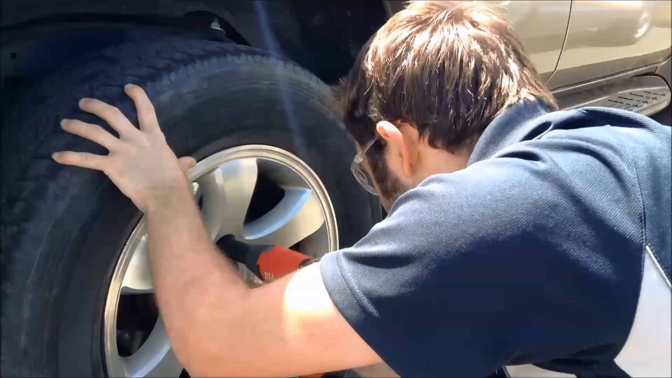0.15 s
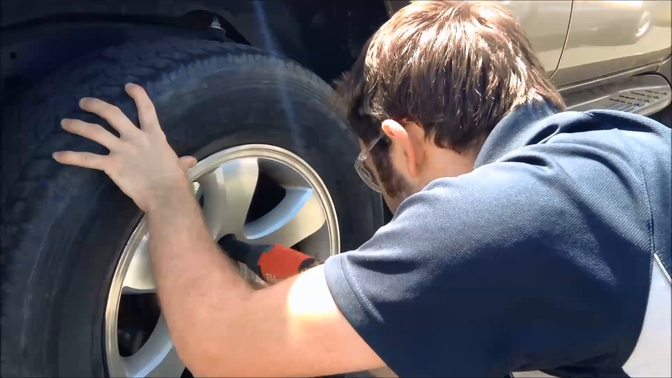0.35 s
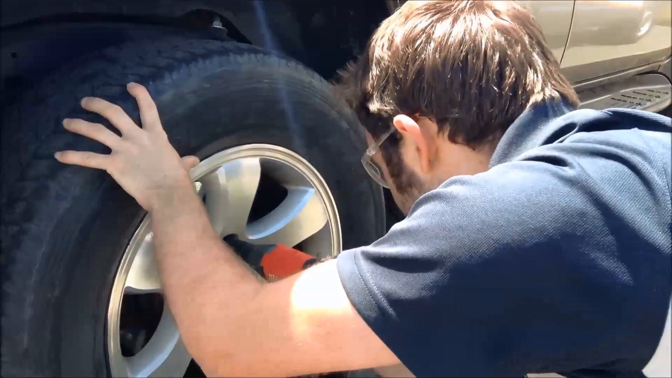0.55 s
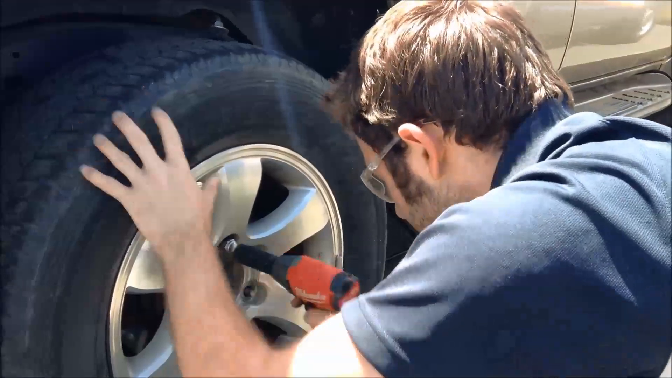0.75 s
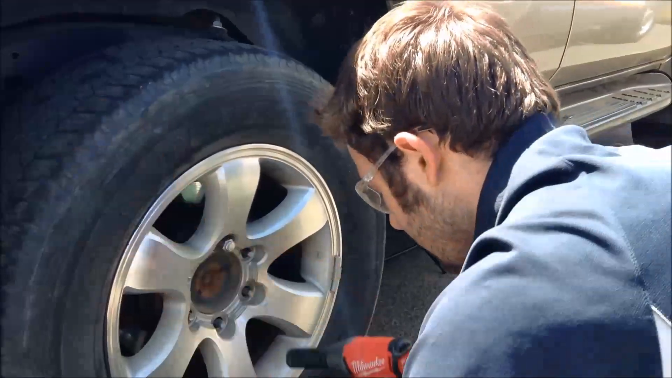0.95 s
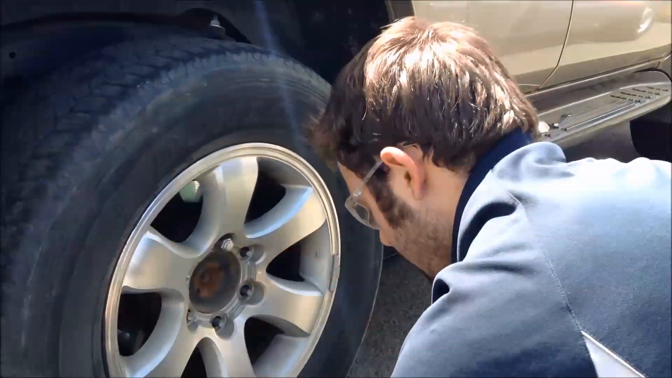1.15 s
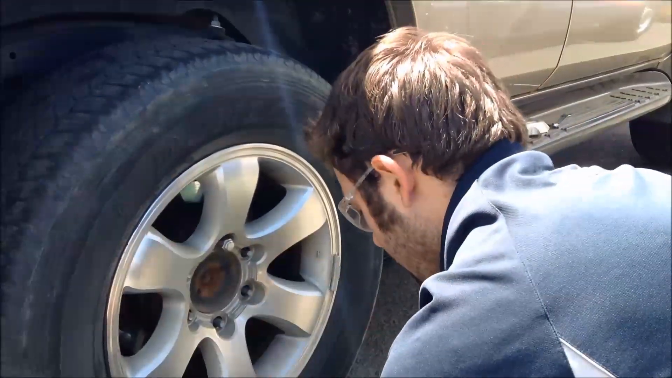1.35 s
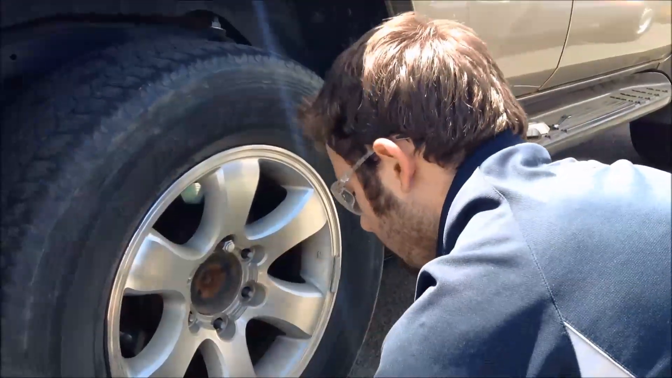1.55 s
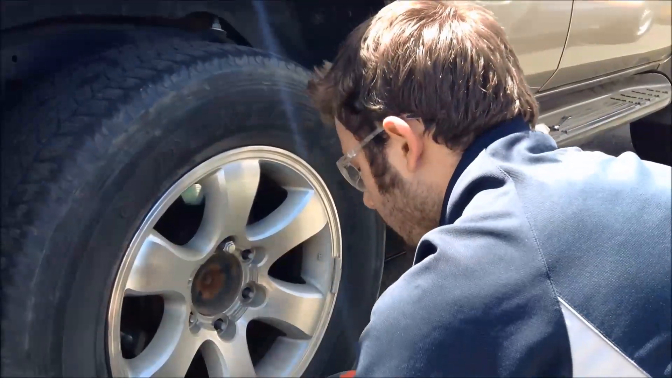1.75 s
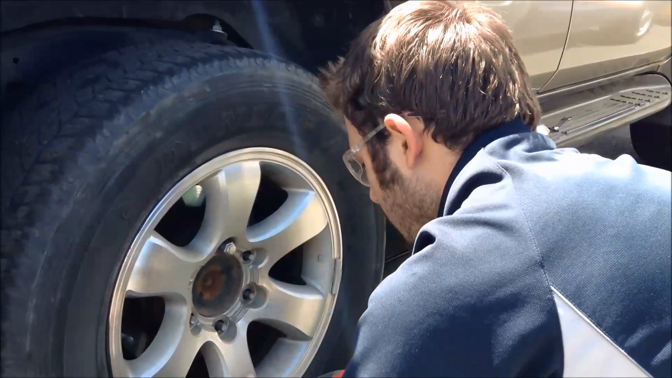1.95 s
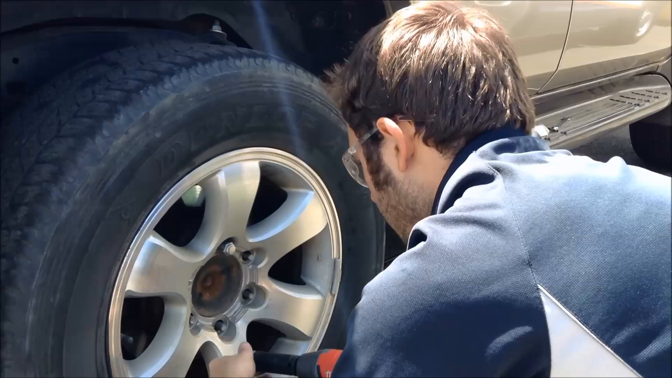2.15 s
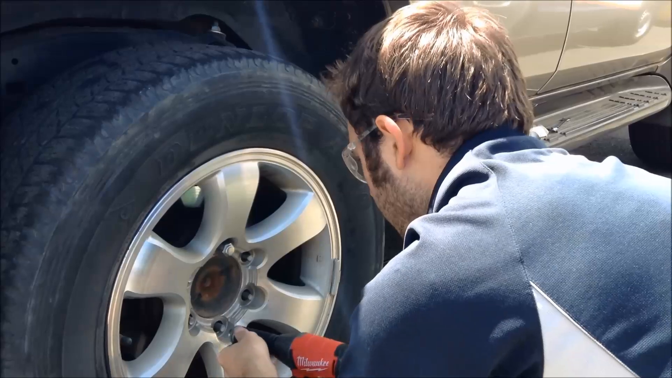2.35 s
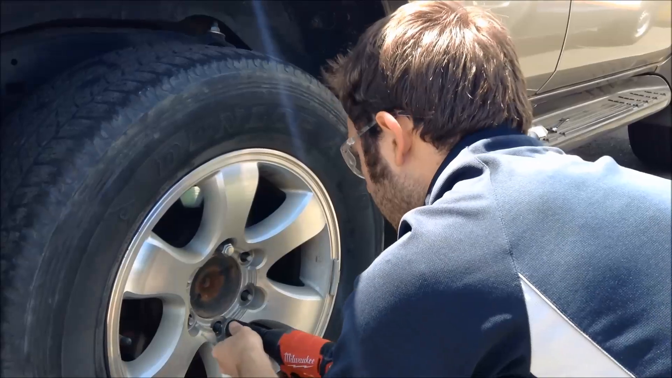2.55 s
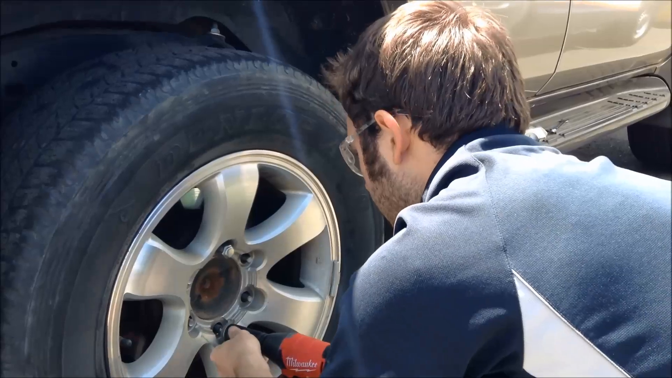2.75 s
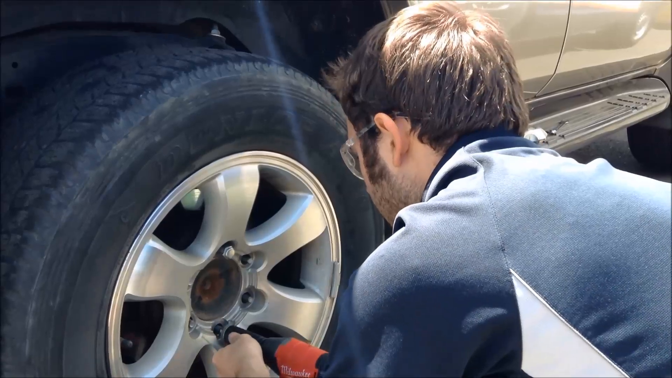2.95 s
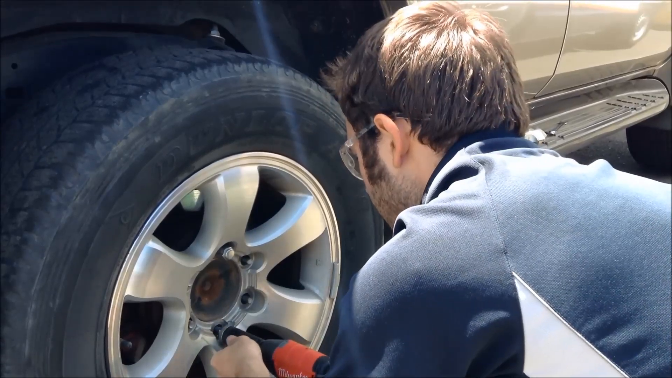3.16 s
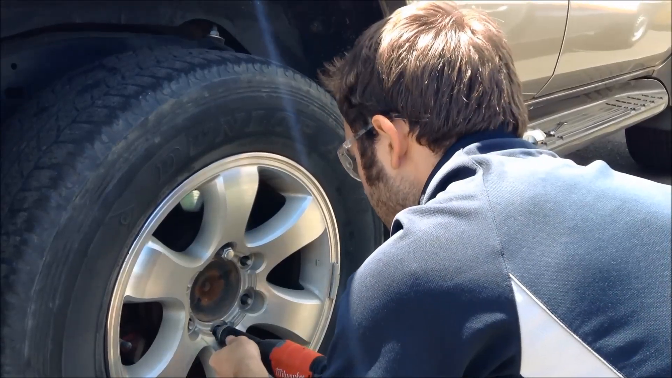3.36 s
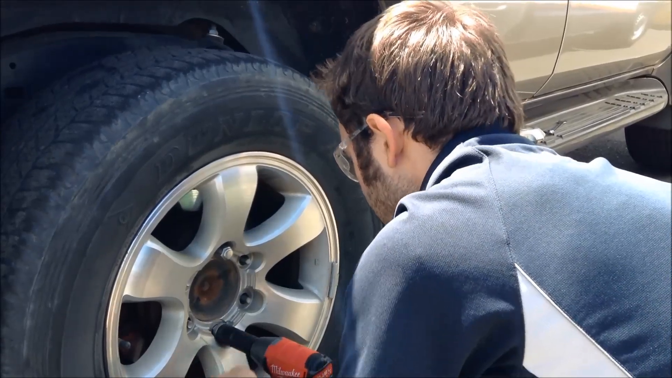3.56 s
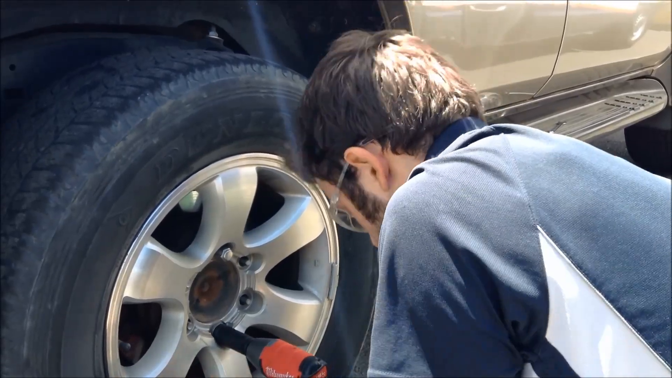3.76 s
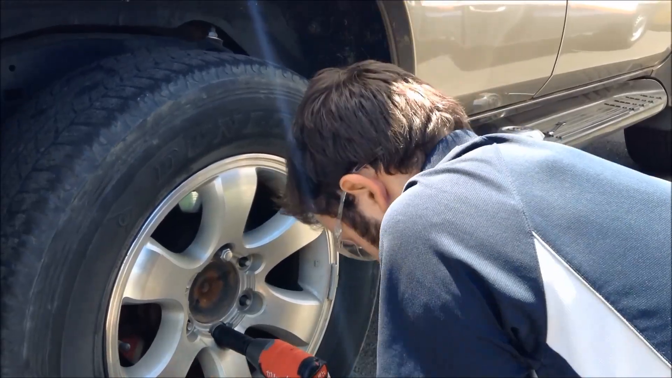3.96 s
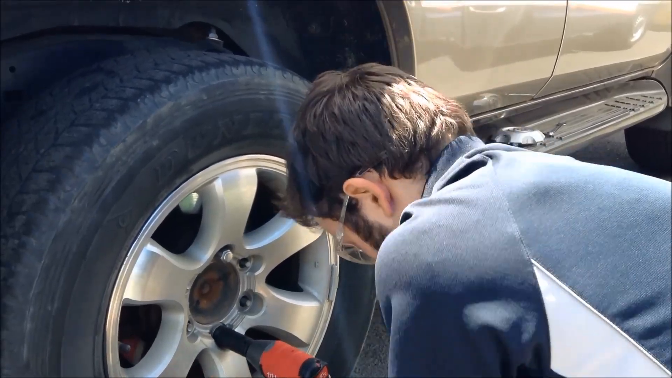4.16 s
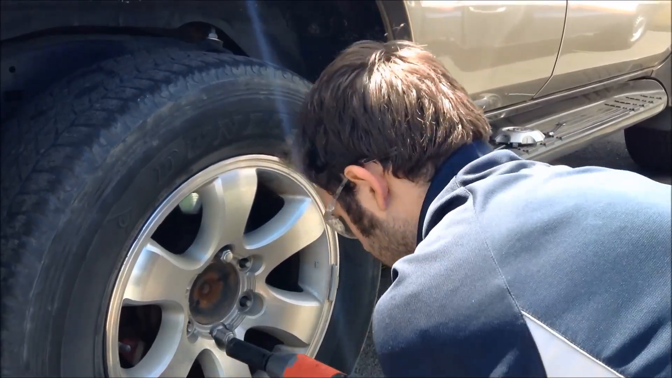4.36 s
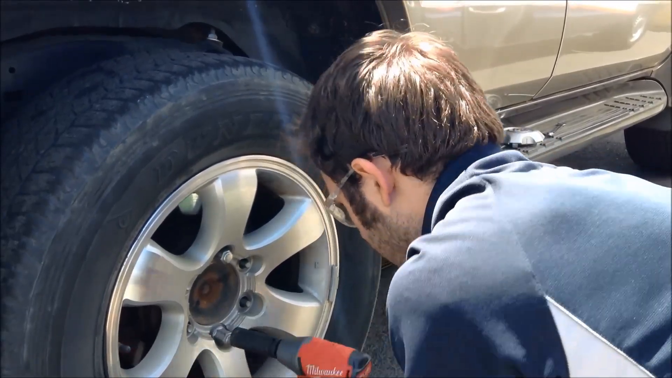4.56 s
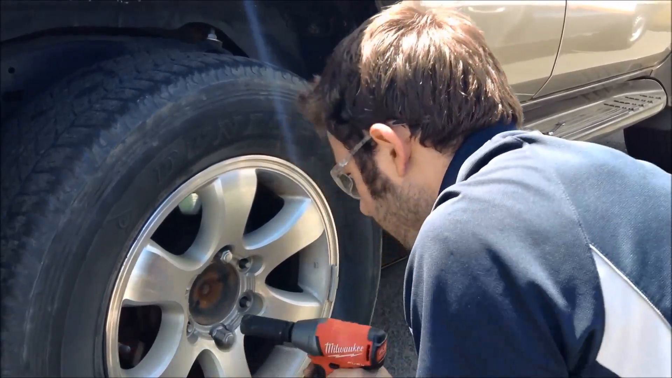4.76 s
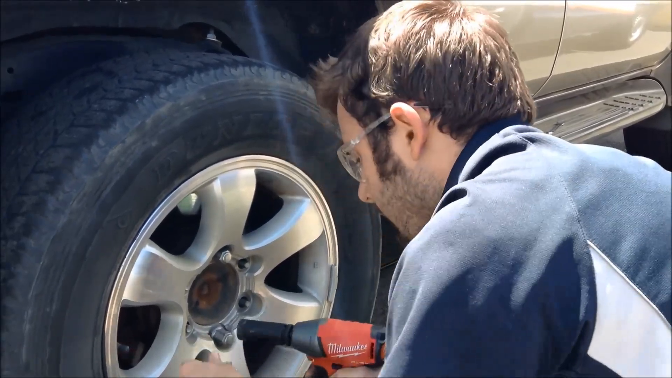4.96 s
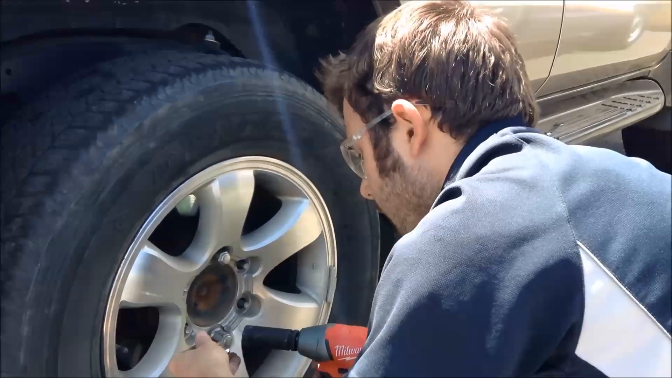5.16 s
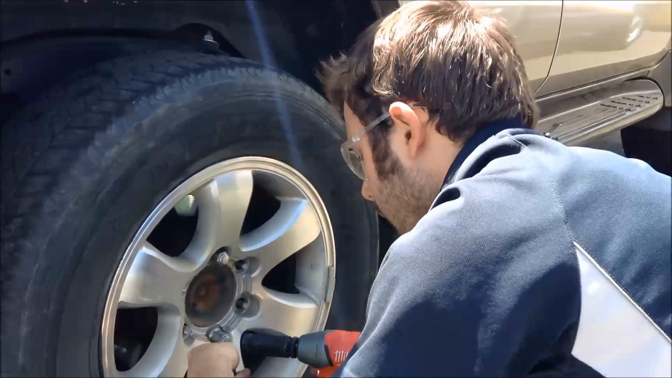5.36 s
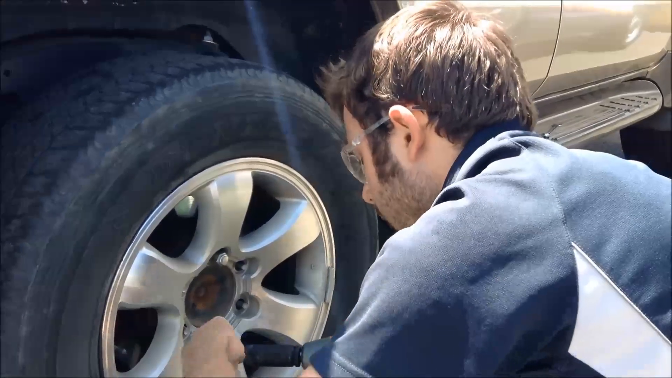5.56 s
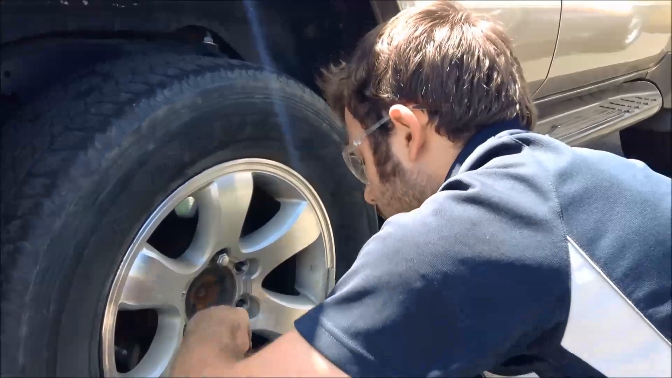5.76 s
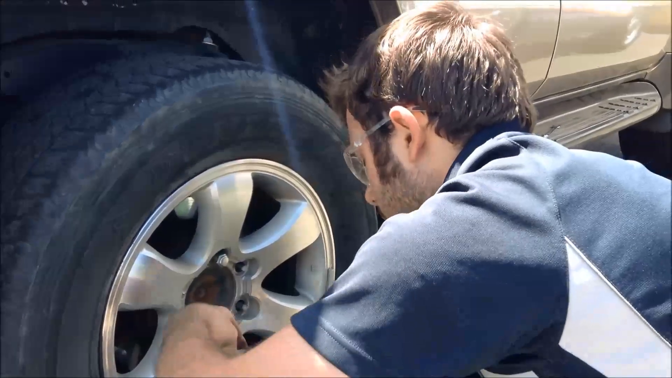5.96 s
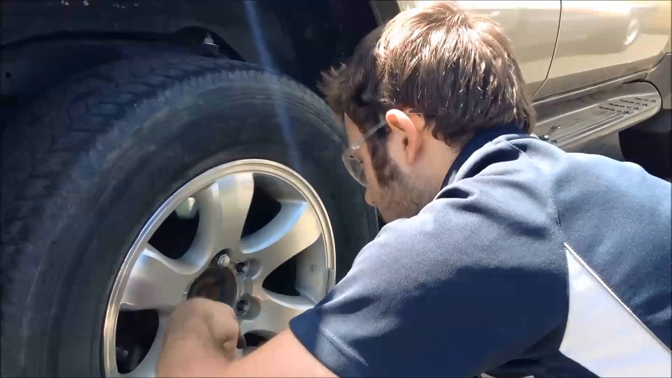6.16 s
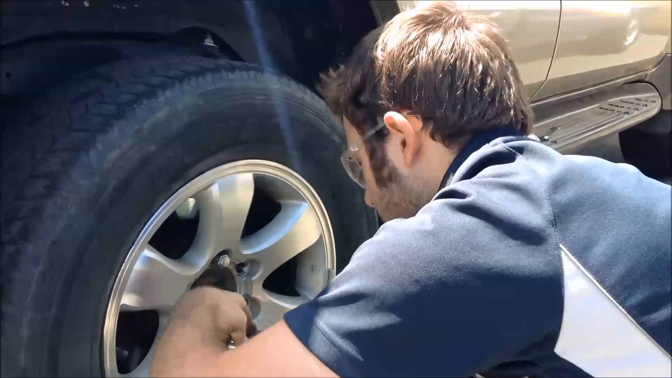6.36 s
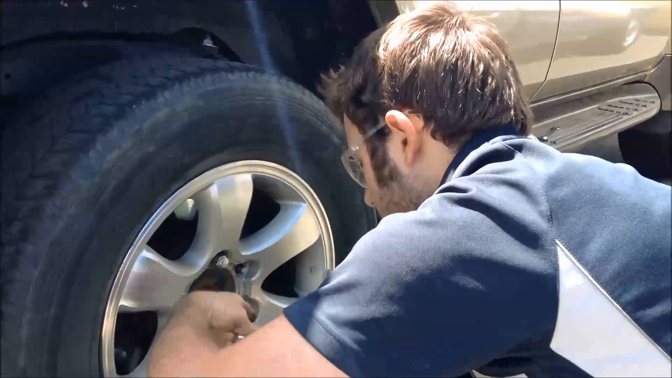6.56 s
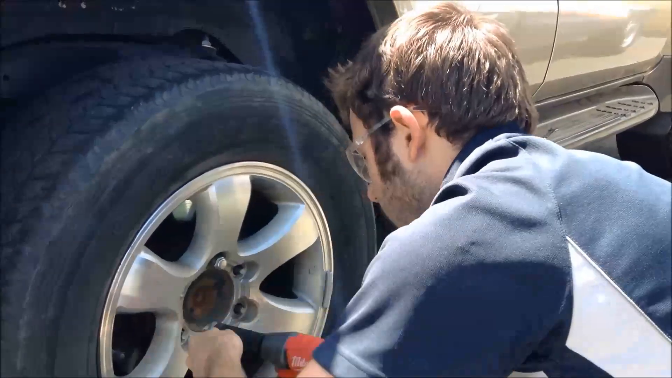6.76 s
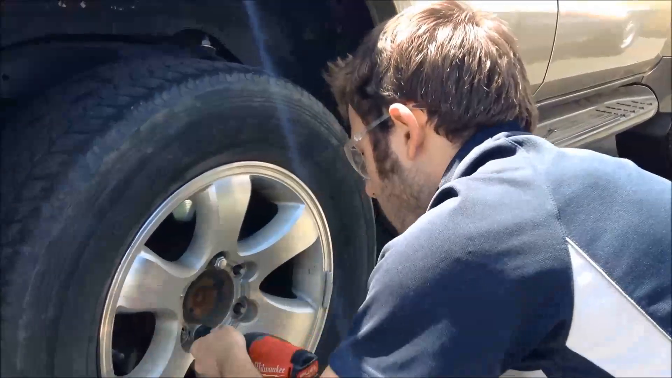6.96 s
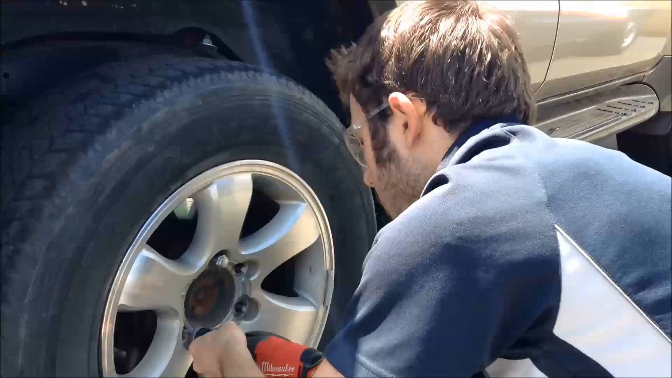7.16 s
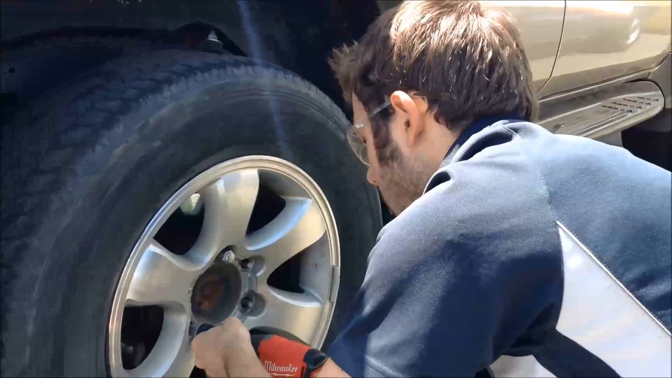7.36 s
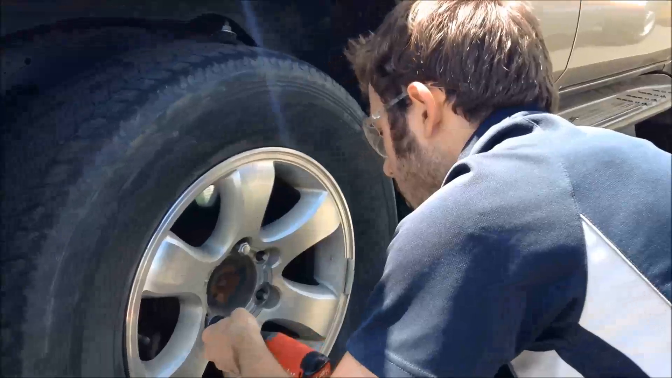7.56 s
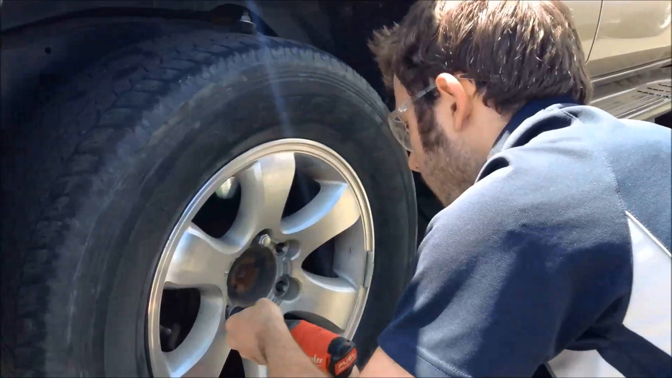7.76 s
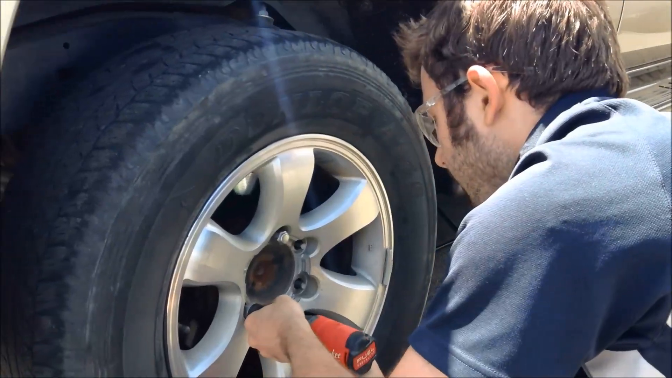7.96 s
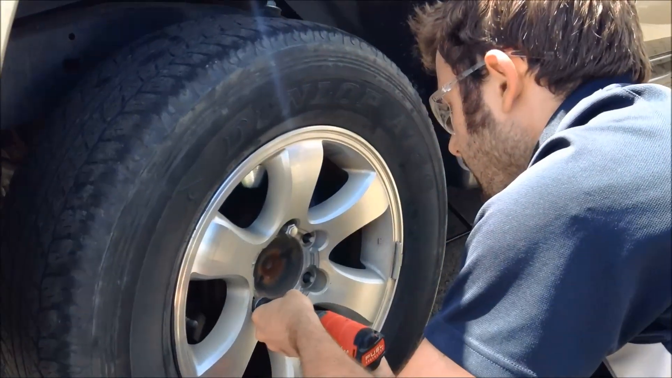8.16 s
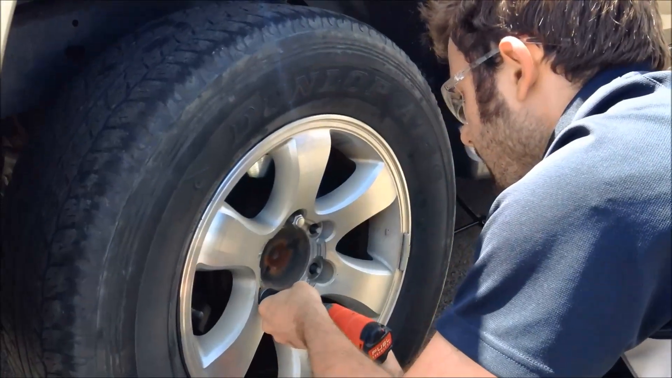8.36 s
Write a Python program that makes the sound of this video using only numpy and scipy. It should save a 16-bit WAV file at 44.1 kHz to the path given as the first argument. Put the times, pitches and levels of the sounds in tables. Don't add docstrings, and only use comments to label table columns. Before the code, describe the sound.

The sound opens with a cordless impact wrench already whirring close by; its loose socket clatters from 0.1 s, then harsh hammering, about fifty blows a second, runs from 0.3 to 0.67 s. The wheel rings briefly and the yard answers. Until 3 s there is distant traffic, soft wind and sparse metal clicks, sharper at 1.8-1.9, 2.25 and 2.7 s. At 3.1 s the socket rattles, the motor whines and whirrs with rising gear notes, and a second heavy burst with low thuds hammers from 3.87 to 4.25 s, stumbling to a stop. A faint cloth brush passes at 4.7 s. A nut rings high and is damped at 5.3 s; light clinks follow at 5.6-5.8, 6.5 and 7.1-7.5 s. Wind rumbles more near 7.9 s. At 8.2 s the socket clatters and the motor whines up again, still running at the end.

```python
import sys
import numpy as np
from scipy import signal
from scipy.fft import rfft, irfft, next_fast_len
from scipy.io import wavfile

SR = 44100
rng = np.random.default_rng(int(sys.argv[2]) if len(sys.argv) > 2 else 0)


def store_pcm(level_fs):
    pcm = np.round(np.clip(level_fs, -1, 1) * 32767).astype(np.int16)
    wavfile.write(sys.argv[1], SR, np.atleast_2d(pcm).T)


def gain_from_db(level_db):
    decades = np.asarray(level_db, float) / 20
    return 10 ** decades


N = 374850

# (time [s], peak level [dB])
BLOW_TIMES = [
    [(0.3092, 0), (0.3311, -1), (0.3511, 1), (0.3716, 0), (0.3925, 1), (0.413, 0), (0.4334, 2), (0.4534, 0),
     (0.4738, 1), (0.4943, 1), (0.5142, 0), (0.5342, 0), (0.5536, 2), (0.5741, 0), (0.594, 2), (0.6134, 0),
     (0.6345, 0)],
    [(3.8733, 0), (3.8943, 3), (3.9152, 0), (3.9362, 1), (3.9571, 1), (3.9781, 1), (3.9985, 1), (4.0185, 1),
     (4.0389, 0), (4.0594, 2), (4.0793, 2), (4.0998, 1), (4.1193, 1), (4.1397, 0), (4.1602, 2), (4.1796, 2),
     (4.2001, 1)],
]
SOCKET_HZ = 12900


def rms_one(x):
    return x / np.sqrt(np.mean(x ** 2) + 1e-20)


def in_time(rows, fade=0.0028):
    s, *columns = np.transpose(rows)
    t = np.arange(N) / SR
    opening = np.clip((t - s[0]) / fade + (s[0] == 0), 0, 1)
    closing = np.clip((s[-1] - t) / fade + 1, 0, 1)
    return [np.interp(t, s, c) for c in columns] + [opening * closing]


def at_hz(points, hz):
    points = np.array(points)
    return np.interp(np.log(hz + 1), np.log(points[:, 0]), points[:, 1])


def colour(x, spectrum):
    size = next_fast_len(N)
    gain = gain_from_db(at_hz(spectrum, np.arange(size // 2 + 1) * SR / size))
    return irfft(rfft(x, size) * rms_one(gain), size)[:N]


def band(x, low_hz, high_hz):
    return signal.sosfilt(signal.butter(2, [low_hz, high_hz], "band", fs=SR, output="sos"), x)


def drift(rate_hz):
    r = np.exp(-2 * np.pi * rate_hz / SR)
    wander = signal.lfilter([1], [1, -2 * r, r * r], rng.standard_normal(N + SR))
    return rms_one(wander[SR:])


def ring(force, hz, t60):
    r, w = gain_from_db(-60 / (t60 * SR)), 2 * np.pi * hz / SR
    return signal.lfilter([0, np.sin(w)], [1, -2 * r * np.cos(w), r * r], force + 1e-18)


def add(out, s, x):
    i = round(s * SR)
    out[i:i + len(x)] += x[:N - i]


def dying(t60, rise=0.0005):
    t60_s = max(t60, .005)
    t = np.arange(int(1.2 * t60_s * SR)) / SR
    return (1 - np.exp(-t / rise)) * gain_from_db(-60 * t / t60_s)


def grit(spread_db):
    return rms_one(rng.standard_normal(N) * gain_from_db(spread_db * drift(340)))


def struck(rows, beat_hz, second):
    out = np.zeros(N)
    for s, db, hz, t60 in rows:
        shape = dying(min(t60, .9))
        t = np.arange(len(shape)) / SR
        tone = np.sin(2 * np.pi * hz * t)
        neighbour = second * np.sin(2 * np.pi * (hz + beat_hz) * t)
        add(out, s, gain_from_db(db) * shape * (tone + neighbour))
    return out


def knocks(rows, sing, bass_db, treble_db, follows, late, hard_db, clang):
    # (frequency [Hz], t60 [s])
    socket_body = [(2630, .017), (3900, .006), (6720, .012), (7620, .008)]
    level = np.zeros((4, N))
    for s, db, bright_db, t60 in rows:
        shares = [(bass_db - 0.45 * bright_db, 1.3), (0, 1), (treble_db + follows * bright_db, .8), (bright_db, 1.1)]
        for k, (share_db, lasts) in enumerate(shares):
            add(level[k], s, gain_from_db(db + share_db - 1.5) * dying(t60 * lasts, rise=0.003))
            add(level[k], s + late, gain_from_db(db + share_db + hard_db) * dying(0.0043))
    noise = grit(spread_db=0.32)
    bands_hz = [(800, 2000), (2000, 7000), (7000, 11800), (11800, 15800)]
    bands = [rms_one(band(noise, *hz)) for hz in bands_hz]
    body = [rms_one(ring(noise, hz, t60)) for hz, t60 in socket_body]
    bands[1] = rms_one(bands[1] + clang * (body[0] + body[1]))
    bands[2] = rms_one(bands[2] + clang * (body[2] + body[3]))
    wall_note = rms_one(ring(noise, SOCKET_HZ + 150, 0.0051))
    bands[3] = rms_one(bands[3] + sing * wall_note)
    return np.sum(level * bands, axis=0)


def outdoors():
    # (frequency [Hz], density [dB per Hz])
    traffic_spectrum = [(18, -80), (30, -44), (85, -19), (126, -14), (182, -1), (270, -5), (341, -8.5),
                        (691, -8.5), (1260, -15.5), (1680, -18), (3880, -26), (11900, -33.5), (15500, -32)]
    # (time [s], level [dB], half length [s])
    gust_times = [(1.299, -50.5, 0.35), (1.838, -48.5, 0.061), (2.398, -44.5, 0.036), (2.76, -44, 0.11),
                  (3.6, -52, 0.59), (4.397, -60, 0.057), (5.483, -55.5, 0.052), (6.874, -49.5, 0.097),
                  (7.361, -44.5, 0.31), (7.86, -38, 0.17), (8.346, -35, 0.13)]
    # (time [s], level [dB])
    sleeve = [(4.65, -59), (4.68, -48), (4.72, -49.5), (4.76, -66)]
    traffic = gain_from_db(-51.5 + 1 * drift(2)) * colour(rng.standard_normal(N), traffic_spectrum)
    rumble = band(band(rng.standard_normal(N), 110, 260), 60, 440)
    wind = rms_one(rumble * gain_from_db(5.5 * drift(17)))
    t = np.arange(N) / SR
    gusts = gain_from_db(-60) + sum(gain_from_db(db) * np.exp(-((t - s) / half) ** 2) for s, db, half in gust_times)
    sleeve_db, gate = in_time(sleeve)
    cloth = gate * gain_from_db(sleeve_db) * band(grit(spread_db=1.0), 1700, 13500)
    return traffic + gusts * wind + cloth


def motor():
    # (time [s], switching whine [Hz], whine level [dB], gear whirr level [dB], its treble [dB])
    runs = [
        [(0.0, 8737, -28, -27, -3), (.086, 8870, -28, -30, -5), (.118, 9000, -32, -27, -3),
         (.146, 9300, -33, -28, 0), (0.236, 9700, -43, -34, -4)],
        [(3.066, 10150, -60, -80, -8), (3.088, 9960, -34, -46, -8), (3.16, 9560, -24, -30, -4),
         (3.275, 9575, -24, -36.5, -10), (3.385, 9590, -25, -33.5, -5), (3.502, 9110, -25, -27, -1),
         (3.74, 8900, -31, -25.5, -1), (3.828, 8750, -33, -24.5, -2), (3.9, 8600, -34, -22, -2)],
        [(8.113, 10120, -48, -75, -8), (8.215, 9960, -39, -48, -10), (8.26, 9850, -33, -31, -3),
         (8.36, 9700, -27, -34, -6), (8.5, 9520, -28, -30, -5)],
    ]
    # (frequency [Hz], density [dB per Hz])
    whirr = [(59, -45), (100, -18), (313, -12.5), (429, -18.5), (898, -15.5), (1110, -5.5), (1460, -9),
             (2470, -5.5), (7410, -6), (8950, -0.5), (10400, -9), (13900, -6.5), (15500, -14.5)]
    # (frequency [Hz], width [Hz], level [dB])
    gear_case = [(1240, 270, -13), (1670, 40, -14.5), (2810, 260, -14)]
    # (time [s], level [dB])
    socket_sing = [(0, -27), (.03, -31), (.05, -17), (.075, -41.5), (.13, -48)]
    whirr_gain_db = 6.5
    t = np.arange(N) / SR
    throb = np.clip((t - 3.5) / .15, 0, 1) * (t < 4) * np.cos(2 * np.pi * 28.7 * (t - 3.727))
    teeth = grit(spread_db=1.8) * gain_from_db(1.0 * drift(23) + 1.8 * throb)
    hiss = colour(teeth, whirr)
    for hz, width_hz, db in gear_case:
        case = rms_one(ring(teeth, hz, 2.2 / width_hz))
        hiss = hiss + gain_from_db(db - 12) * case * gain_from_db(3 + 4 * drift(14))
    treble = band(hiss, 6500, 16500)
    out, wobble = np.zeros(N), drift(88)
    for run in runs:
        hz, whine_db, whirr_db, treble_db, gate = in_time(run)
        phase = 2 * np.pi * np.cumsum(hz * (1 + .0008 * wobble)) / SR
        whine = gain_from_db(whine_db + 1.1 * wobble) * np.sqrt(2) * np.sin(phase)
        gears = gain_from_db(whirr_db + whirr_gain_db) * (hiss + (gain_from_db(treble_db) - 1) * treble)
        out += gate * (whine + gears)
    sing_db, gate = in_time(socket_sing)
    return out + gate * gain_from_db(sing_db) * rms_one(ring(teeth, SOCKET_HZ, .03))


def mesh():
    # (time [s], frequency [Hz], level [dB])
    notes_in_time = [
        [(0, 4200, -24), (.04, 4200, -26), (.08, 4180, -40)],
        [(3.44, 2950, -41), (3.66, 3480, -36), (3.73, 3650, -34), (3.755, 3930, -25), (3.82, 4100, -25),
         (3.88, 3900, -30)],
        [(3.74, 2420, -34), (3.8, 2520, -30), (3.86, 2640, -30), (3.9, 2600, -32)],
        [(3.5, 1050, -42), (3.7, 1130, -37), (3.9, 1150, -37)],
        [(3.3, 10500, -38), (3.5, 10900, -36), (3.72, 11500, -38)],
        [(8.37, 2500, -44), (8.43, 2800, -41), (8.5, 3500, -40)],
        [(8.33, 10500, -44), (8.5, 10700, -38)],
    ]
    out, waver_db, wander = np.zeros(N), 4 * drift(40), .006 * drift(100)
    for k, rows in enumerate(notes_in_time):
        hz, db, gate = in_time(rows, fade=.015)
        own = k * SR // 7
        phase = 2 * np.pi * np.cumsum(hz * (1 + np.roll(wander, own))) / SR
        out += gate * gain_from_db(db + np.roll(waver_db, own)) * np.sin(phase)
    return out


def thuds():
    # (time [s], level [dB], frequency
    # [Hz], t60 [s])
    tyre = [(.113, -19, 244, 0.18), (.113, -18, 276, 0.1), (.152, -17.5, 284, 0.4), (.34, -28, 281, 0.68),
            (4.21, -27.5, 329, 0.48)]
    # (time [s], level [dB], t60 [s])
    jolts = [(3.122, -27, 0.041), (3.869, -11, 0.1), (3.998, -20, 0.053), (4.121, -26.5, 0.21),
             (7.139, -34.5, 0.14), (7.318, -45, 0.043), (8.231, -32, 0.22)]
    push_levels = [-45, -23]
    push = np.zeros(N)
    for s, db, t60 in jolts:
        add(push, s, gain_from_db(db) * dying(t60, rise=0.0022))
    for burst, db in zip(BLOW_TIMES, push_levels):
        for s, _ in burst[2::2]:
            add(push, s, gain_from_db(db + 2 * rng.standard_normal()) * dying(0.079, rise=0.0033))
    rough = rms_one(band(rng.standard_normal(N), 120, 520))
    return struck(tyre, beat_hz=8.9, second=0.38) + push * rough


def socket_clatter():
    # (time [s], peak level [dB], brightness [dB], t60 [s])
    slack = [(.1141, -14.5, -24, 0.13), (.1356, -6.5, -2, 0.051), (.1424, -10.5, -3.5, 0.15),
             (.172, -5, -14, 0.022), (.1804, -8, -4, 0.043), (.2405, -2.5, -4.5, 0.052),
             (.2748, -3, -3.5, .035), (.2831, -7.5, -5, 0.057), (.301, -15, -9.5, 0.074),
             (3.1243, -6, 0, 0.045), (3.1374, -11.5, -5, 0.057), (3.1534, -20, -8, .03),
             (3.1694, -19, 8, .025), (3.1916, -8, 0.5, 0.043), (3.2034, -11.5, -18, 0.035),
             (3.2284, -20, 4.5, 0.043), (3.2423, -21, -8.5, 0.077), (8.2285, -5.5, -0.5, 0.082),
             (8.2435, -16, -7, 0.075), (8.2595, -19, 12, 0.042), (8.2735, -17, 6, 0.049),
             (8.2895, -7, 0.5, 0.041), (8.3004, -13, 3, 0.037), (8.3075, -15, -22, 0.039),
             (3.8573, -38, -4, 0.029)]
    return knocks(slack, sing=0.75, bass_db=-12.5, treble_db=4.5, follows=0.95, late=0.00066,
                  hard_db=3.5, clang=0.2)


def hammer():
    # (sets in [s], full [s], stops [s], first level [dB], full level [dB])
    chatter = [
        (0.263, 0.347, .675, -18, -12.5),
        (3.848, 4.159, 4.24, -13.5, -13),
    ]
    # (time [s], peak level [dB])
    last_blows = [(0.6594, 0), (.6515, -5), (.669, -6), (4.2565, -12), (4.2184, -2), (4.2244, -1),
                  (4.2344, -2), (4.2404, -3)]
    # (frequency [Hz], density [dB per Hz])
    strike = [(180, -30), (300, -6.5), (372, -12.5), (509, -14), (1180, -6), (1840, -8), (2400, -5),
              (2880, -5), (3690, -2.5), (5500, -3), (7140, -6), (9600, -3), (13100, -7), (15500, -7)]
    crack, shaken = np.zeros(N), np.full(N, .55)
    blows = BLOW_TIMES[0] + BLOW_TIMES[1] + last_blows
    for (s, peak_db), (late, weak) in zip(blows, rng.random((len(blows), 2))):
        db = peak_db - 3.5
        add(crack, s, gain_from_db(db + 5.5) * dying(.016, rise=.0003))
        add(crack, s + .003 + .004 * late, gain_from_db(db - 12 - 6 * weak) * dying(.025))
        add(shaken, s, .4 * dying(.08, rise=.001))
    crack *= grit(spread_db=1)
    crack += 0.09 * ring(crack, 3950, .004)
    loose = grit(spread_db=1.5)
    for start, full, stop, first_db, db in chatter:
        swell = [(start, first_db - db), (full, 0), (stop, 0), (stop + 0.032, -17), (stop + 0.2, -42)]
        change_db, gate = in_time(swell)
        crack += gate * gain_from_db(db + change_db) * shaken * loose
    return colour(crack, strike)


def wheel(force):
    # (frequency [Hz], level [dB], t60 [s])
    modes = [(293, -21, .5), (1085, -9, .1), (1195, -22, .8), (2013, -17, .2), (2440, -18, .42),
             (2350, -9, .08), (2530, -5, .1), (2660, -12, .15), (3310, -20, .3), (3725, -13, .06),
             (3900, -14, .08), (4180, -7, .1), (4355, -19, .5), (4570, -12, .2)]
    return gain_from_db(-41) * sum(gain_from_db(db) * ring(force, hz, t60) for hz, db, t60 in modes)


def tinkles():
    # (time [s], peak level [dB], frequency [Hz], t60 [s])
    small_parts = [(1.393, -30, 11950, .12), (2.662, -39, 11970, .3), (2.76, -41, 11970, .3),
                   (3.29, -35, 12000, .4), (4.555, -44, 12300, .06), (1.9365, -9, 13860, .025),
                   (1.826, -34, 12900, .2), (7.27, -44, 11980, .15), (7.575, -46, 12000, .12),
                   (6.697, -39, 11980, .13), (7.2, -43, 11950, .3), (7.455, -28, 12000, .13),
                   (.8, -57, 12850, .7), (4.41, -50, 12850, .4), (5.592, -35, 12880, .4),
                   (5.802, -29, 12870, .14), (8.233, -15, 12900, .08)]
    # (time [s], peak level [dB], frequency [Hz], t60 [s])
    bore_and_rim = [(5.592, -31, 1320, .08), (5.79, -38, 1320, .1), (5.803, -27, 1320, .1),
                    (5.956, -36, 1320, .09), (6.49, -43, 1320, .2), (6.64, -34, 1320, .07),
                    (.668, -23, 1195, .3), (4.215, -17, 2660, .14), (4.23, -39, 1195, .9),
                    (7.437, -36, 3780, .12), (8.232, -22, 1150, .12), (4.27, -39, 4355, .8),
                    (6.5455, -12, 13100, .03), (6.572, -38, 8050, .03), (.67, -25, 2013, .12),
                    (2.662, -30, 2680, .13), (2.664, -33, 4450, .18), (2.76, -40, 2650, .1),
                    (7.162, -38, 3730, .06), (6.546, -30, 8100, .07)]
    return struck(small_parts + bore_and_rim, beat_hz=31, second=.2)


def hand_knocks():
    # (time [s], peak level [dB], brightness [dB],
    # t60 [s])
    touches = [(.855, -44, -4, 0.04), (.972, -23, -15, 0.02), (1.018, -36, -12, 0.04),
               (1.2421, -50.5, 6.5, 0.14), (1.281, -42.5, -19, 0.05), (1.392, -45.5, 15.5, 0.044),
               (1.8192, -21.5, 5.5, 0.05), (1.8243, -24.5, -14.5, 0.033), (1.928, -38, -3.5, 0.044),
               (1.9347, -28.5, 16, 0.041), (2.396, -44, 6, 0.024), (2.877, -48, -19, 0.044),
               (2.1763, -34.5, 2.5, 0.043), (2.2471, -21.5, 14, 0.032), (2.3875, -49.5, 27, 0.055),
               (2.6589, -11, -1.5, 0.062), (2.7576, -20, -6, 0.066), (2.837, -40.5, -19.5, 0.09),
               (2.987, -40.5, -27, 0.061), (2.899, -55, 2, 0.027), (3.0144, -47, -13.5, 0.027),
               (4.5044, -47, -10, 0.051), (4.5536, -45, 5.5, 0.11), (4.5944, -44, -5, 0.021),
               (5.3083, -45.5, 18, 0.019), (5.3567, -43, -12, .03), (5.376, -51, 18, 0.036),
             (5.5906, -24.5, 2, 0.041), (5.7568, -30.5, -6, 0.029), (5.786, -35.5, 1, 0.059),
             (5.801, -21, 9.5, 0.045), (5.9524, -29, -1.5, 0.07), (5.964, -39, -10.5, 0.057),
             (6.486, -42.5, -6, 0.17), (6.545, -22.5, 12.5, 0.038), (6.505, -51, -12, .03),
             (6.605, -40, -3, 0.079), (6.6364, -25.5, 3.5, 0.066), (6.6957, -49, 9, .03),
             (7.036, -46.5, -19.5, 0.033), (7.096, -28.5, 16.5, 0.035), (7.106, -24, 5, 0.033),
             (7.054, -47, -8, .03), (7.696, -51, -12, 0.027), (7.1591, -21.5, 4, 0.052),
             (7.212, -37, -5, 0.048), (7.267, -42, -10, 0.035), (7.3755, -42, 9.5, 0.026),
             (7.3875, -34, -12, 0.077), (7.434, -34.5, -11, 0.22), (7.442, -41, 10, 0.034),
             (7.51, -37, -4, 0.042), (7.4555, -44, 1, 0.091), (7.4932, -21.5, 4.5, 0.054),
             (7.5443, -32.5, -4, 0.044), (7.595, -37, -3, 0.018), (7.6549, -41.5, -33, 0.027),
             (8.1536, -49, -4, 0.031)]
    return knocks(touches, sing=2.4, bass_db=-10.0, treble_db=-11, follows=1.0, late=0.00275,
                  hard_db=4.5, clang=0.27)


def nut():
    # (time [s], level [dB])
    held = [(5.309, -24), (5.34, -24), (5.358, -30), (5.383, -30), (5.392, -43), (5.43, -60)]
    db, gate = in_time(held, fade=0.00049)
    return gate * gain_from_db(db) * np.sin(2 * np.pi * 12000 * np.arange(N) / SR)


def yard(x):
    # (frequency [Hz], t60 [s])
    decay = [(200, 1), (1000, 0.6), (3000, .6), (4000, 0.5), (5000, .62), (8000, 0.42), (15000, 0.14)]
    noise, t = rng.standard_normal((2, SR)), np.arange(SR) / SR
    edges_hz = 100 * 2 ** np.arange(0, 7.7, .33)
    tail = np.zeros(SR)
    for k, (low_hz, high_hz) in enumerate(zip(edges_hz, edges_hz[1:])):
        tail += band(noise[k % 2], low_hz, high_hz) * gain_from_db(-60 * t / at_hz(decay, low_hz))
    tail *= np.clip(t / .015, 0, 1)
    return signal.fftconvolve(x, tail / np.sqrt(np.sum(tail ** 2)))[:N]


def scene():
    blows = hammer()
    tool = motor() + mesh() + socket_clatter() + blows + wheel(blows)
    tool = signal.sosfilt(signal.butter(4, 150, "high", fs=SR, output="sos"), tool)
    ringing = (tinkles() + nut()) * gain_from_db(2.5 * drift(36))
    hands = hand_knocks() + ringing
    back = yard(gain_from_db(-15) * tool + gain_from_db(-22) * hands)
    add(back, .0425, gain_from_db(-30) * hands)
    return (tool + hands + back + thuds() + outdoors())[None]


def band_limit(x):
    return signal.sosfilt(signal.butter(12, 16370, fs=SR, output="sos"), x)


def record(dry):
    overload = .87
    drive = dry / overload
    bent = np.clip(drive, -9, 9) ** 3 / 3 + drive
    x = overload * np.tanh(bent)
    x = signal.sosfilt(signal.butter(1, 80, "high", fs=SR, output="sos"), x)
    x = signal.sosfilt(signal.cheby2(18, 80, 15850, fs=SR, output="sos"), x)
    return band_limit(x)


dry = scene()
out = record(dry)
store_pcm(out)
```